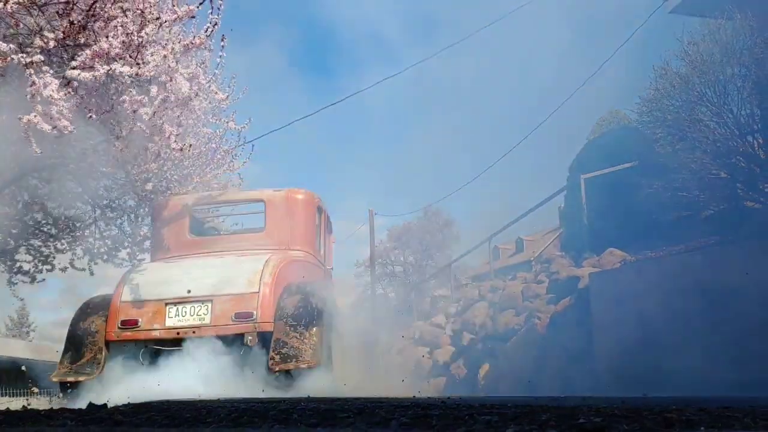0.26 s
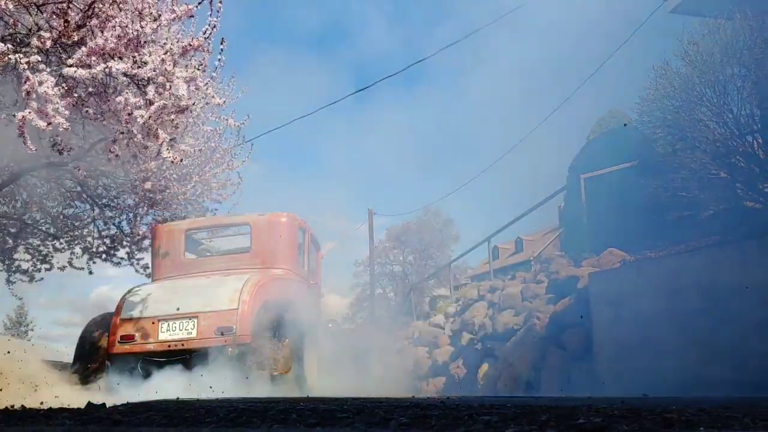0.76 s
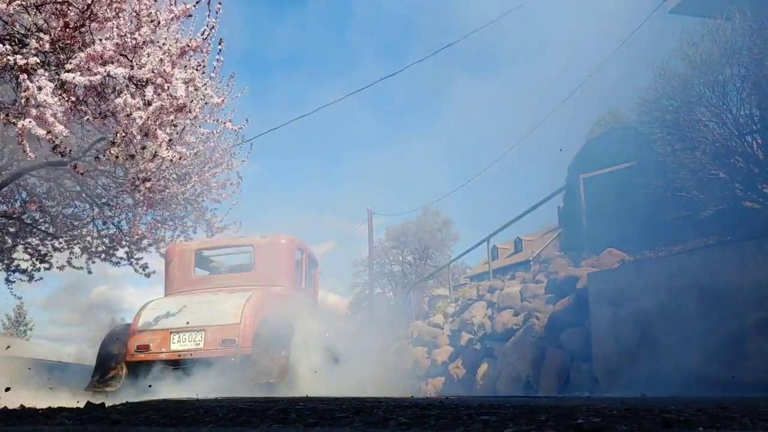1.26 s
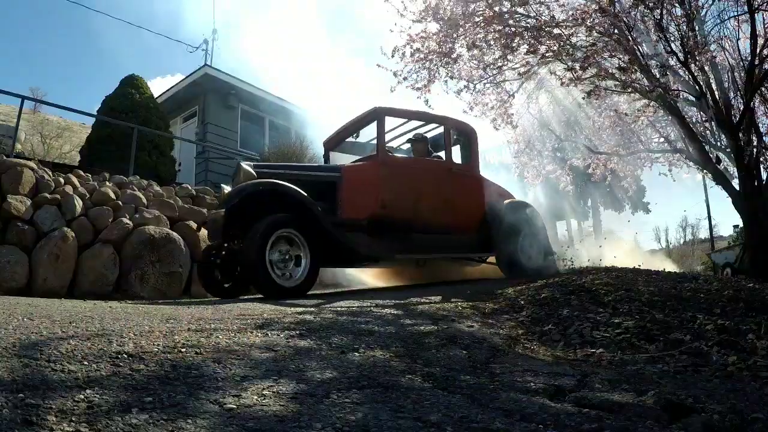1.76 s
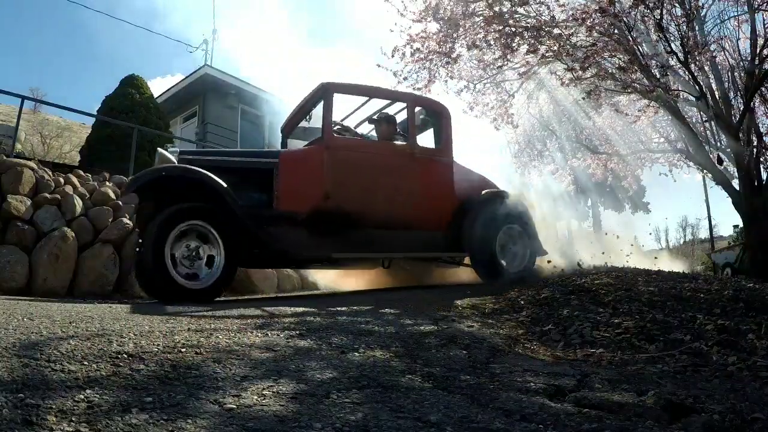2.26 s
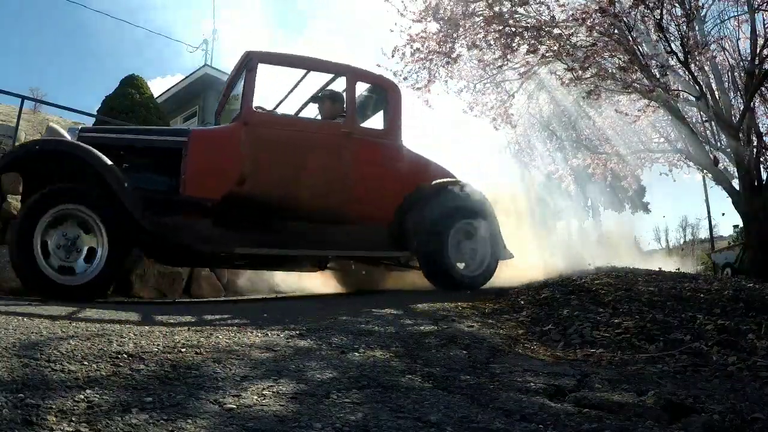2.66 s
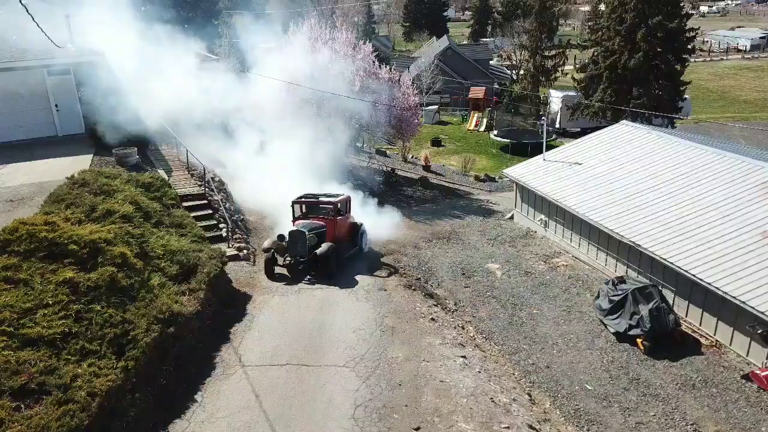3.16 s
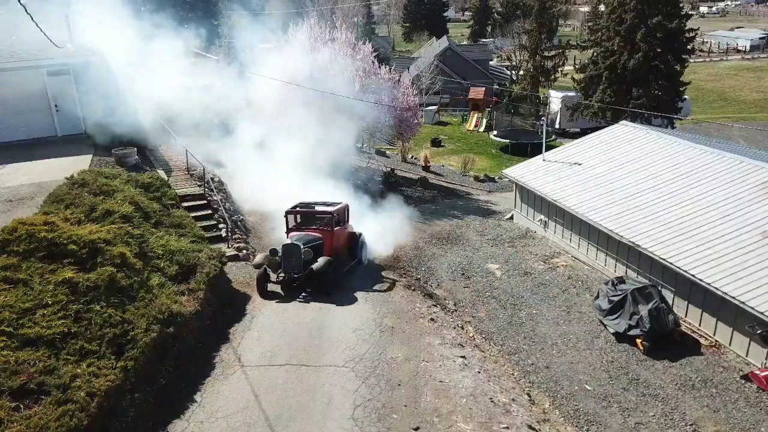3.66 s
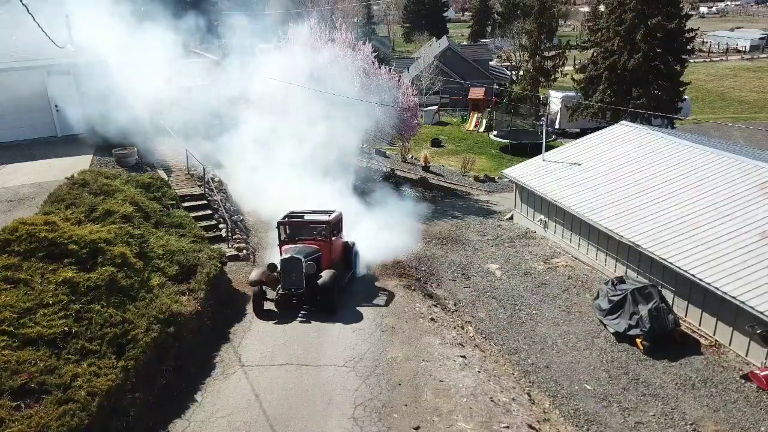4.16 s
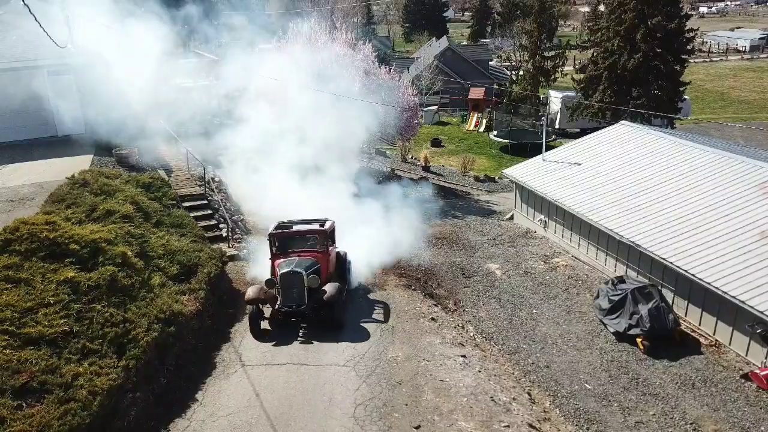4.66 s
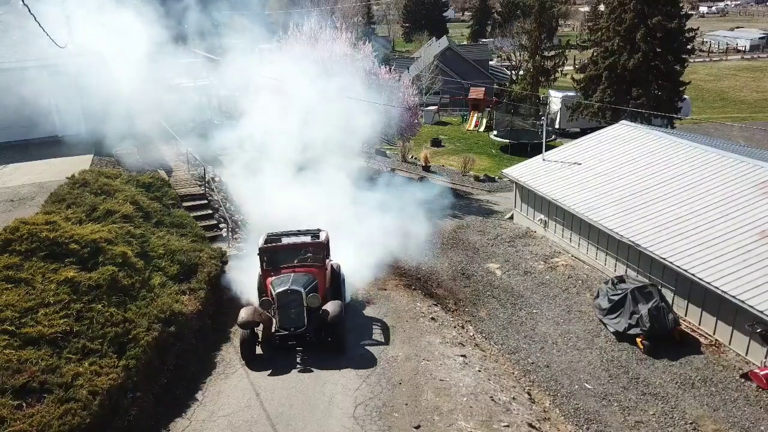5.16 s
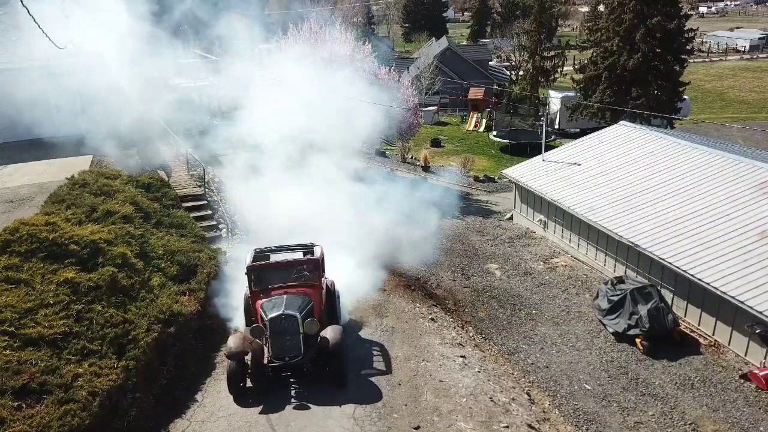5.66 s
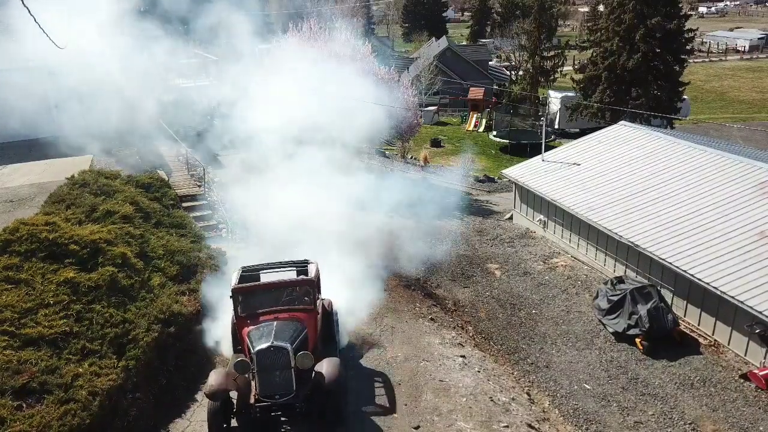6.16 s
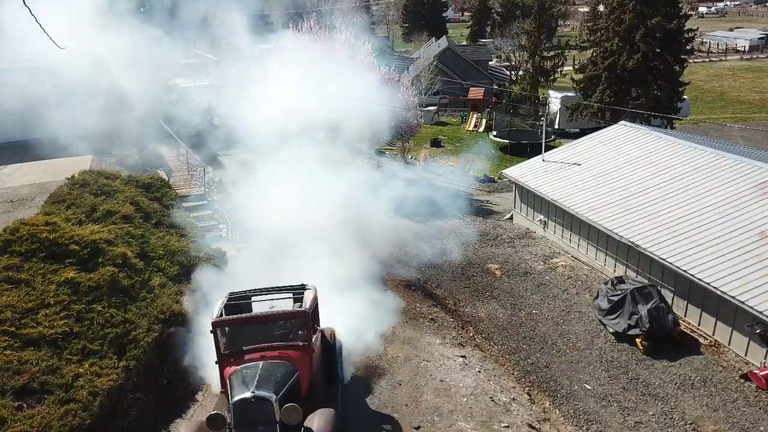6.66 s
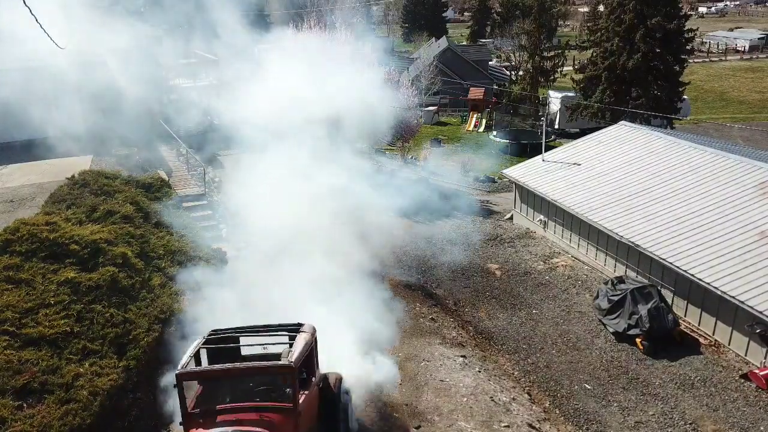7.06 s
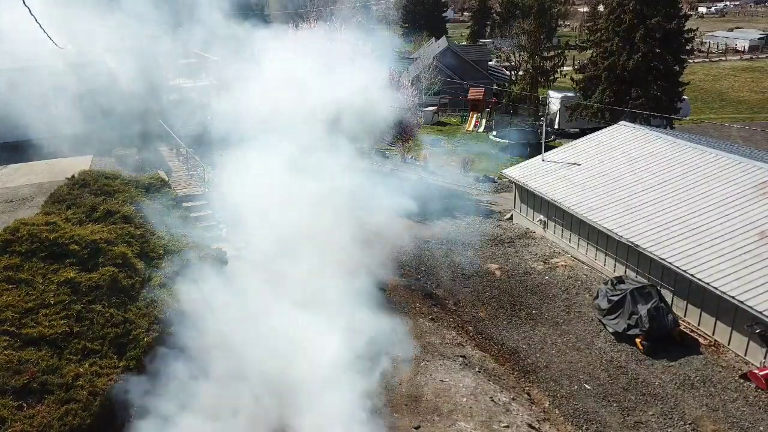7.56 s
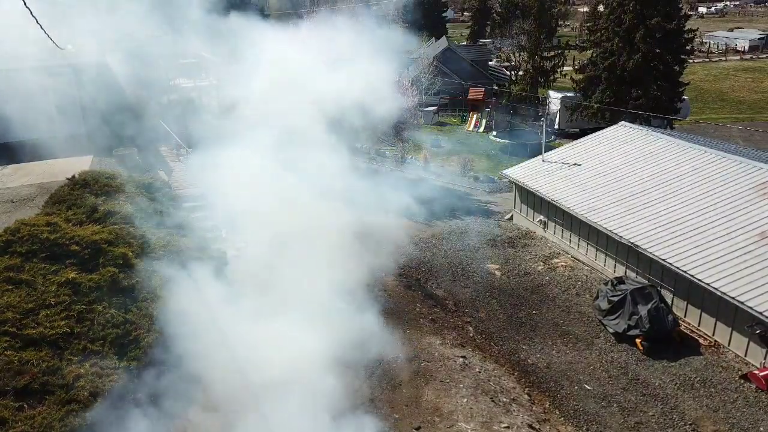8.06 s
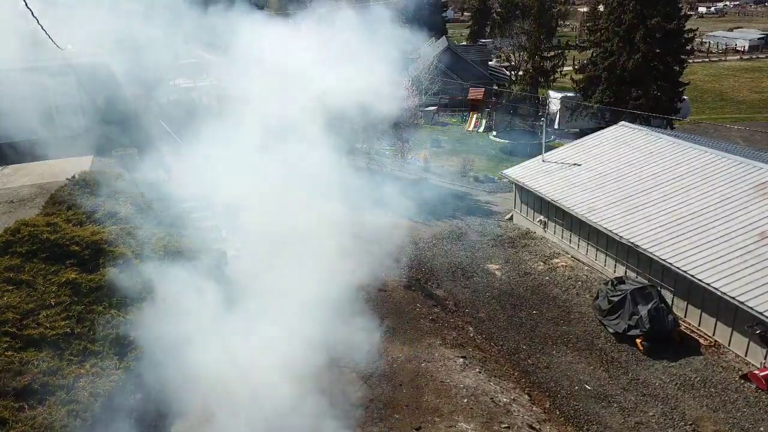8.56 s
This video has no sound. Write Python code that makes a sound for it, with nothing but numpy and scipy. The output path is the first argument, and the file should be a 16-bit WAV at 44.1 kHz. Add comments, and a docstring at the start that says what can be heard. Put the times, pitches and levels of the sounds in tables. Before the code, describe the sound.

An old open-piped V8 revs hard in short throttle stabs and long pulls, barking and rasping over chirping, scrubbing tyres on a driveway.

```python
"""An old V8 coupe with open pipes does a burnout on a driveway: uneven firing orders boom, pulses bark, hiss rasps.
0-2.4 s: short throttle pushes, mostly near 4000 rpm; noise scrubs over a low rumble, tyre chirps squeal clearest.
2.6 s: a long pull from below 2800 rpm; further pushes climb above 5200 rpm by 4.9 s as the squeal thins out.
5.4 s: a second pull from below 2800 rpm; sharp cracks and hard single pulses, scattered so far, crowd at 6.9-7.5 s.
7.9 s: pushes above 5400 rpm, a dip, one last push. Grit and faint echoes run throughout."""
import sys
import numpy as np
from scipy import signal
from scipy.fft import rfft, irfft
from scipy.io import wavfile

SR = 44100
rng = np.random.default_rng(int(sys.argv[2]) if len(sys.argv) > 2 else 0)


def transcribe(signal):
    """Save signal, clipped to [-1, 1], as a 16-bit WAV file at the path in sys.argv[1]."""
    frames = np.atleast_2d(signal).T
    limited = np.clip(frames, -1, 1)
    pcm = np.round(limited * 32767).astype(np.int16)
    wavfile.write(sys.argv[1], SR, pcm)


N = 388942

# throttle pushes, coasting between: start_s, lift_s, start_rpm, lift_rpm, midway_bow_rpm,
# start_load_db, lift_load_db, midway_swell_db, coast_load_db
PUSHES = [(0, 0.093, 4008, 4117, -12, 4, -2, -2, -9), (0.211, 0.617, 3598, 4218, 40, -0.5, 2.5, 2, -5),
          (0.756, 1.252, 3446, 4095, 81, 0, -2.5, 3, -0.5),
          (1.367, 1.611, 4050, 4500, 0, -0.5, -2, 5.5, -3.5),
          (1.836, 2.066, 3541, 3950, -7, -3, -1, 1.5, -3.5),
          (2.2, 2.357, 3800, 3857, -10.5, -6, -9.5, 5, -7),
          (2.624, 3.212, 2769, 4080, -170, -11, 1, -1, -3.5),
          (3.317, 3.597, 4030, 4716, -22, -2, -0.5, 3.5, 0),
          (3.765, 4, 4458, 4753, -19, -7.5, -2.5, 6, -2.5),
          (4.164, 4.48, 4600, 5243, 15, -4.5, -4, 4.5, -4.5),
          (4.646, 4.894, 5048, 5207, -4.5, -5, 1.5, 4.5, 1.5),
          (5.385, 5.751, 2777, 3680, 7.5, -4.5, -1, 4, -1),
          (5.899, 6.17, 3670, 4425, 3.5, -0.5, -0.5, 4.5, 1), (6.293, 6.732, 4410, 4932, 47, 0, 1, 2.5, -1),
          (6.922, 7.262, 4113, 4812, -87, -3, -2, 2, -2.5), (7.375, 7.803, 4580, 5176, 77.5, -2, -5, 3, -2),
          (7.916, 8.25, 5103, 5425, 127, -1, -5, 2, -10), (8.279, 8.32, 5426, 5296, 8.5, -2, -6.5, 0, -8),
          (8.44, 8.825, 4320, 4867, -72.5, -6.5, -9.5, -4.5, 2)]
# firings of one four-stroke cycle: place_eighths, strength_gain, front_sharpness_gain
FIRINGS = [(0, 0.8676, .7), (1.001, 0.475, .25), (1.999, 0.2178, .1), (3, 0.94, 1), (4, 0.1652, .2),
           (4.999, 0.786, .8), (6, 0.817, .6), (7, 0.3242, .15)]
# strong multiples of the cycle rate: order
BOOM_ORDERS = (3, 5, 8, 10, 13)
# answer of each booming order to the throttle: level_db, load_share, shut_db
BOOM_RESPONSE = [(-31, 0.76, 10), (0, 0.39, -4), (-1, 1.27, 0), (-10.5, 0.36, -9.5), (3, 1.25, -6)]
# pipe resonances under the booming orders: freq_hz, level_db
BOOM_RESONANCES = [(70, -6.5), (95, -6), (115, 1), (145, 0.5), (170, 2), (225, -2.5), (265, 3.5),
                   (310, 7.5), (370, -5), (425, 2), (455, 5.5), (500, 0), (550, 2), (600, -12)]
# weaker multiples of the cycle rate: order, level_db (before voicing and pipe)
OVERTONES = [(4, -9), (6, -6.5), (7, -7.5), (9, -4), (11, -4), (12, -14), (14, -3), (15, -9), (16, -4.5),
             (17, -7), (18, -5), (19, -7), (20, -14), (21, -6), (22, -6), (23, -13), (24, -11), (25, -15),
             (26, -8), (27, -12), (28, -17), (29, -12), (30, -17), (31, -16), (32, -15), (34, -18),
             (35, -19)]
# exhaust tone: time_s, low_overtones_db, middle_overtones_db, top_overtones_db, tenth_order_db
VOICING = [(.4, -9, 1, 2.5, 2.5), (.95, -5.5, 1.5, -1.5, -1), (1.4, -6.5, 0.5, 1.5, -3.5),
           (2.05, -6.5, 3, 2.5, -4), (2.7, 4.5, 6.5, 1.5, -3.5), (3.1, 5.5, 6.5, 6.5, -7),
           (3.5, 1.5, -0.5, -2, -5), (4.3, -1, -0.5, -4, -1), (4.8, -2, -1, -9, 2),
           (5.5, 5.5, 1.5, 7, -0.5), (6.0, 2.5, 6.5, 9, -0.5), (6.55, 2.5, 6, 8, 1), (7.1, 3, 4, 6.5, -1.5),
           (8.1, 9.5, 6, 5.5, -3), (8.32, 11, 3, -4, 2.5), (8.6, 16, 7, 5, -1)]
# exhaust at neutral load as the car creeps and turns: time_s, boom_db, firing_tone_db, bark_db, rasp_db
CARRY = [(0, -20, -18.5, -30.5, -34.5), (.5, -19.5, -22, -30.5, -45.5), (1.5, -17.5, -26, -31, -50.5),
         (2.2, -16, -31, -28, -52), (2.8, -24, -15, -30, -40.5), (3.3, -16, -26, -33.5, -51),
         (4.5, -17.5, -38, -28.5, -42.5), (5.4, -26.5, -22, -40.5, -54), (6.5, -21, -32.5, -36.5, -48),
         (7.1, -22, -26.5, -35, -45.5), (7.9, -17, -32, -44, -52.5), (8.82, -25.5, -24, -38.5, -55)]
# ragged firing: time_s, half_length_s, boom_sag_db (negative lifts), fourth_order_db
STUMBLES = [(0.607, 0.033, 8, -28.5), (1.64, 0.026, 2.5, -26), (2.129, 0.032, 2.5, -37),
            (3.653, 0.056, 5.5, -30), (4.093, 0.043, 2, -28), (4.58, 0.041, -2, -20.5),
            (4.918, 0.025, 8, -30), (6.751, 0.026, 5.5, -29), (7.329, 0.017, 2.5, -29),
            (8.159, 0.033, 5, -34), (8.258, 0.03, 11, -31.5), (8.43, 0.029, 8, -58)]
# coarse spitting: time_s, half_length_s, level_db (relative to rasp), brightest_hz
SPITS = [(0.393, .17, 0.5, 2430), (0.945, 0.17, 4, 2480), (1.936, 0.14, 13, 3797), (2.747, 0.091, 6, 3706),
         (3.45, 0.13, -0.5, 4010), (4.359, 0.13, -1, 4094), (5.496, 0.11, 2.5, 3893),
         (6.462, 0.075, -3, 3378), (7.076, 0.14, 2.5, 3690)]
# sharp exhaust cracks and hard single firing pulses: time_s, level_db (before colouring)
CRACKS = [(0.2335, -22), (.489, -25), (0.766, -23), (0.8165, -22), (1.864, -22.5), (1.871, -20.5),
          (1.961, -27), (3.118, -28), (5.392, -27), (5.435, -25), (6.43, -32), (6.482, -30), (6.507, -34),
          (6.9191, -17), (6.926, -18), (6.948, -23), (7.005, -29), (7.063, -32), (7.09, -27), (7.119, -30),
          (7.171, -27), (7.196, -26), (7.454, -31.5)]
# spinning tyres and low rumble: time_s, squeal_pitch_hz, pitch_spread_share (nominal), squeal_db, scrub_db
TYRES = [(0, 1360, .025, -36.5, -32), (.17, 1335, .012, -31.5, -30.5), (.3, 1400, .09, -32.5, -31),
         (.55, 1410, .06, -36, -32.5), (.7, 1385, .015, -35, -30.5), (.8, 1460, 0.01995, -29.5, -29.5),
         (.95, 1330, .11, -41, -31.5), (1.25, 1200, .17, -37, -36), (1.78, 1130, .19, -38, -30.5),
         (2.2, 1250, .16, -40.5, -34.5), (2.5, 1370, .08, -41, -35), (2.8, 1300, .11, -43.5, -34),
         (3.6, 1090, .14, -35.5, -35), (4.4, 1200, .16, -43, -34), (5.0, 1130, .17, -42.5, -38),
         (5.35, 1250, .1, -46, -38), (6.0, 1160, .15, -44.5, -39.5), (7.5, 1070, .1, -42.5, -38.5),
         (8.4, 1060, .06, -47, -42), (8.82, 1060, .09, -49, -43.5)]
# sizzle of hot rubber: time_s, level_db (relative to rasp)
SIZZLE = [(0, -12.5), (2.6, -6), (3.2, -6.5), (3.9, -6), (4.4, -9.5), (4.8, -12), (5.0, -18), (5.4, -12),
          (8.82, -38.5)]
# spectra of overtone ring, turbulent burble and crack thud, rasp, crack, scrub with low rumble: freq_hz, level_db
RING_SPECTRUM = [(60, -29.5), (120, -18), (150, 0.5), (185, 2.5), (240, -0.5), (285, 3), (375, -8.5),
                 (430, 4.5), (490, -4), (540, -1.5), (600, 0), (660, -2.5), (720, -1.5), (860, -7.5),
                 (1150, -6), (1600, -11), (3000, -37.5)]
PIPE_SPECTRUM = [(40, -38.5), (75, -23), (120, -17.5), (170, -11.5), (250, 1), (370, 5), (450, 2),
                 (680, -6), (880, -6), (1150, -10), (1600, -4.5), (2500, -32), (5000, -51)]
RASP_SPECTRUM = [(500, 3.5), (1000, 18.5), (1500, 1.5), (2000, 12), (2700, 10), (3400, 4), (4200, 5.5),
                 (5000, -17.5), (6000, -20), (8000, -22), (10500, -29), (13500, -35.5), (16000, -47)]
CRACK_SPECTRUM = [(500, 4), (1000, 9.5), (1600, 5), (2000, 4), (2700, 9), (4200, 4.5), (5200, -7),
                  (6500, -16), (10000, -23.5), (16000, -29)]
SCRUB_SPECTRUM = [(25, -32), (42, -36.5), (55, -16), (120, 5.5), (200, 2.5), (400, 2.5), (650, 3.5),
                  (1000, 1), (1500, -1.5), (2000, -6), (3200, -11.5), (4300, -14.5), (5200, -24),
                  (6200, -32), (9000, -37), (14000, -43.5)]

SPEED_WOBBLE_SHARE, FIRING_JITTER_CYCLES = .001, .001
ORDER_FLUTTER_DB, PULSE_SPREAD_DB = 2.0, 2.1
MIDDLE_ORDER, TOP_ORDER = 13, 20  # first order of each overtone group
FULL_SHUT_RPM_PER_S = 3900  # rate of fall read as a fully shut throttle
COAST_EBB_DB_PER_S, LOAD_LAG_S = 32.5, 0.0071
RASP_LOAD_SHARE, SCRUB_LOAD_SHARE, SQUEAL_SHUT_DB = 1, 0.31, 1.5
SPIT_DECAY_S, SPIT_SPREAD_DB, CRACKLES_PER_S = .0012, 3.8, 3500
CUTOFF_HZ = 15200


def throttle(bite_db=2.0, bite_s=0.031):
    """Crank rpm, load dB and closure 0-1: bowed ramps in pushes, ebbing load while coasting."""
    t, pushes = np.arange(N) / SR, np.array(PUSHES)
    rpm = np.interp(t, pushes[:, :2].ravel(), pushes[:, 2:4].ravel())
    shut = np.clip(-np.gradient(rpm) * SR / FULL_SHUT_RPM_PER_S, 0, 1) ** 2
    load_db = np.zeros(N)
    for start_s, lift_s, _, _, bow_rpm, start_db, lift_db, swell_db, coast_db in PUSHES:
        held = (t >= start_s) & (t < lift_s)
        along = (t[held] - start_s) / (lift_s - start_s)
        arch = 4 * along * (1 - along)
        rpm[held] += bow_rpm * arch
        load_db[held] = start_db + (lift_db - start_db) * along + swell_db * arch
        coasting = t >= lift_s
        load_db[coasting] = coast_db - COAST_EBB_DB_PER_S * (t[coasting] - lift_s)
    # load overshoots briefly when a shut throttle opens
    bite = np.maximum(lagged(shut, bite_s) - shut, 0)
    return rpm, lagged(load_db + bite_db * bite, LOAD_LAG_S), lagged(shut, LOAD_LAG_S)


def boom_levels(cycle_hz, load_db, shut, carry_db):
    """Booming orders follow load by their own shares and swell on pipe resonances; the lowest rises when shut."""
    levels = []
    for order, (level_db, load_share, shut_db), base_db in zip(BOOM_ORDERS, BOOM_RESPONSE, carry_db):
        resonance_db = at_hz(BOOM_RESONANCES, order * cycle_hz)
        levels.append(base_db + level_db + load_share * load_db + shut_db * shut + resonance_db)
    return levels


def exhaust_note(cycles, shut, boom_db, bark_db, overtone_db=0.0, muffle_db=-7.0):
    """Periodic exhaust: clean booming orders plus jittered overtones ringing the pipe, duller when shut."""
    t = np.arange(N) / SR
    note, pulses = np.zeros(N), np.zeros(N)
    low_db, middle_db, top_db, _ = in_time(VOICING)
    lump = from_db(.7 * drift(20))
    for order, level_db in zip(BOOM_ORDERS, boom_db):
        note += from_db(level_db) * lump * engine_order(cycles, order)

    uneven = cycles + FIRING_JITTER_CYCLES * drift(70)
    for order, level_db in OVERTONES:
        if order < MIDDLE_ORDER:
            voicing_db = low_db
        else:
            voicing_db = (middle_db if order < TOP_ORDER else top_db) + muffle_db * shut
        gain = from_db(level_db + voicing_db + ORDER_FLUTTER_DB * drift(6.6))
        pulses += gain * engine_order(uneven, order, lead_rad=5.28)
    pulse_gain = from_db(bark_db + overtone_db + 1.6 * drift(60))
    note += colour(pulses * pulse_gain, RING_SPECTRUM)

    stumble_tone = engine_order(cycles, order=4)
    for time_s, half_s, sag_db, level_db in STUMBLES:
        ragged = np.exp(-((t - time_s) / half_s) ** 2)
        note = note * from_db(-sag_db * ragged) + from_db(level_db) * ragged * stumble_tone
    return note


def engine_order(cycles, order, lead_rad=4.4):
    """Multiple of the cycle rate, phased by the firing pattern so orders add to push then suction."""
    place, strength, _ = np.transpose(FIRINGS)
    phasors = strength * np.exp(-2j * np.pi * order * place / len(FIRINGS))
    lag_rad = np.angle(np.sum(phasors))
    return np.cos(2 * np.pi * order * cycles + lag_rad + lead_rad)


def exhaust_blast(cycles, bark_db, rasp_db, hiss_db=-0.5, spit_db=0.0, burble_s=0.0021, burble_db=-11.0):
    """Turbulent exhaust: each sharp front gates pipe-coloured burble and bright hiss; listed spells spit."""
    t = np.arange(N) / SR
    clicks = firing_clicks(cycles, PULSE_SPREAD_DB, sharp=True)
    burble = colour(puffs(clicks, burble_s) * rng.standard_normal(N), PIPE_SPECTRUM)
    burble = from_db(bark_db + burble_db) * rms_one(burble)

    gate = puffs(clicks, .0022) + .05
    rasp = from_db(hiss_db) * rms_one(colour(gate * rng.standard_normal(N), RASP_SPECTRUM))

    # sparse tiny shocks inside each puff
    spit_puffs = puffs(firing_clicks(cycles, SPIT_SPREAD_DB), SPIT_DECAY_S)
    crackle = spit_puffs * rng.standard_normal(N) * (rng.random(N) < CRACKLES_PER_S / SR)
    for time_s, half_s, level_db, peak_hz in SPITS:
        spit_spectrum = [(500, -14), (1500, -8), (peak_hz, 0), (4600, -7), (5500, -19), (7000, -26),
                         (14000, -33)]
        spell = np.exp(-((t - time_s) / half_s) ** 4)
        rasp = rasp + from_db(level_db + spit_db) * spell * rms_one(colour(crackle, spit_spectrum))
    return burble + from_db(rasp_db) * rasp


def firing_clicks(cycles, spread_db, sharp=False):
    """One click per exhaust valve opening, randomly varied, sized by strength or front sharpness."""
    clicks, turns = np.zeros(N), np.arange(int(cycles[-1]) - 1)
    chance = rng.standard_normal((400, len(FIRINGS)))
    for j, (place, strength, sharpness) in enumerate(FIRINGS):
        at = np.searchsorted(cycles, turns + place / len(FIRINGS))
        size = sharpness if sharp else strength
        clicks[at] += size * from_db(spread_db * chance[turns, j])
    return clicks


def cracks(crack_db=0.0, thud_db=0.0, decay_s=0.00084, shock_gain=1.01, tearing_gain=0.79):
    """Sharp exhaust cracks and hard single firing pulses: shock front and noise burst, bright plus a pipe thud."""
    clicks = np.zeros(N)
    for time_s, level_db in CRACKS:
        clicks[round(time_s * SR)] = from_db(level_db)
    shock = shock_gain * puffs(clicks, .0001)
    tearing = tearing_gain * puffs(clicks, decay_s) * rng.standard_normal(N)
    burst = shock + tearing
    crack = from_db(crack_db) * colour(burst, CRACK_SPECTRUM)
    thud = from_db(thud_db) * 2 * colour(burst, PIPE_SPECTRUM)
    return crack + thud


def tyres(rasp_db, load_db, shut, scrub_flutter_db=2.0, grit_per_s=500, grit_db=-18.5):
    """Stick-slip squeal over broad scrub noise with low rumble, load-following sizzle, random grit impacts."""
    pitch_hz, spread, squeal_db, scrub_db = in_time(TYRES)
    squeal_db = squeal_db + SQUEAL_SHUT_DB * shut
    scrub_db = scrub_db + SCRUB_LOAD_SHARE * load_db
    sizzle_db, = in_time(SIZZLE)

    scrub_noise = rng.standard_normal(N) * from_db(scrub_flutter_db * np.tanh(drift(13.0)))
    scrub = rms_one(colour(scrub_noise, SCRUB_SPECTRUM))

    stones = (rng.random(N) < grit_per_s / SR) * rng.random(N)
    grit_spectrum = [(800, -17.5), (2500, -10.0), (4200, 2.5), (6000, -16.5), (14000, -29.5)]
    grit = rms_one(colour(puffs(stones, 0.0012) * rng.standard_normal(N), grit_spectrum))

    sizzle_spectrum = [(3000, -19.5), (5000, 9.5), (6500, -1), (8500, -5.0), (11000, -14.5), (15000, -22.5)]
    sizzle = rms_one(colour(rng.standard_normal(N), sizzle_spectrum))
    return (from_db(squeal_db) * squeal(pitch_hz, spread)
            + from_db(scrub_db) * (scrub + from_db(grit_db) * grit)
            + from_db(rasp_db + sizzle_db) * sizzle)


def squeal(pitch_hz, spread):
    """Seven tread patches stick and slip in broken chirps: near unison at low spread, scattered at high."""
    chirps = 0
    for _ in range(7):
        slow_bend = spread * np.tanh(drift(5)) * 1.4
        rough_bend = (.026 + .3 * spread) * drift(200)
        hz = pitch_hz * np.exp(slow_bend + rough_bend)
        tone = np.sin(2 * np.pi * np.cumsum(hz) / SR)
        chirps = chirps + tone * from_db(5 * np.tanh(drift(16) - .3) + 3 * drift(90))
    return rms_one(chirps)


def yard(x, t60_s=0.21):
    """Faint echoes from driveway and rock wall: decaying noise tail after a 12 ms gap."""
    t = np.arange(SR // 2) / SR
    tail = rng.standard_normal(len(t)) * from_db(-60 * t / t60_s) * (t > .012)
    echoes = signal.fftconvolve(x, tail / np.sqrt(np.sum(tail ** 2)))[:N]
    return x + colour(echoes, [(200, -30), (900, -17), (9000, -22)])


def puffs(clicks, decay_s):
    """Exponentially decaying envelope after each click."""
    return signal.lfilter([1], [1, -np.exp(-1 / (decay_s * SR))], clicks + 1e-18)


def colour(x, spectrum):
    """Causal minimum-phase filter with the given spectrum, built by folding its cepstrum."""
    size = 8192
    grid_hz = np.maximum(np.arange(size // 2 + 1) * SR / size, 1)
    cepstrum = irfft(np.log(from_db(at_hz(spectrum, grid_hz))))
    cepstrum[1:size // 2] *= 2
    cepstrum[size // 2 + 1:] = 0
    return signal.fftconvolve(x, irfft(np.exp(rfft(cepstrum))))[:N]


def at_hz(spectrum, hz):
    """Spectrum level in dB, interpolated on log frequency."""
    points_hz, db = np.transpose(spectrum)
    return np.interp(np.log(hz), np.log(points_hz), db)


def drift(rate_hz):
    """Smooth random wander, roughly rate_hz turns a second, spread near 1."""
    r = np.exp(-80 * np.pi * rate_hz / SR)
    # one point per 40 samples; the first 2000 settle the filter
    slow = signal.lfilter([1], [1, -2 * r, r * r], rng.standard_normal(N // 40 + 2002))[2000:]
    return np.interp(np.arange(N) / 40, np.arange(len(slow)), rms_one(slow))


def lagged(x, lag_s):
    """First-order lag of a control signal."""
    r = np.exp(-1 / (lag_s * SR))
    return x[0] + signal.lfilter([1 - r], [1, -r], x - x[0])


def in_time(rows):
    """Each column of a time table, interpolated at every sample."""
    time_s, *columns = np.transpose(rows)
    return [np.interp(np.arange(N) / SR, time_s, c) for c in columns]


def rms_one(x):
    """Scale to rms 1."""
    return x / np.sqrt(np.mean(x ** 2) + 1e-20)


def from_db(db):
    """Decibels to gain."""
    return 10 ** (np.asarray(db) / 20)


def scene():
    """Crank speed times the exhaust, load sets its levels; cracks, tyres and yard echoes join."""
    rpm, load_db, shut = throttle()
    low_db, firing_db, bark_db, rasp_db = in_time(CARRY)
    cycle_hz = rpm / 120 * (1 + SPEED_WOBBLE_SHARE * drift(25))  # two turns per cycle
    cycles = np.cumsum(cycle_hz) / SR
    tenth_db = low_db + in_time(VOICING)[-1]
    boom_db = boom_levels(cycle_hz, load_db, shut, (0, low_db, firing_db, tenth_db, bark_db))
    bark_db = bark_db + load_db
    rasp_db = rasp_db + RASP_LOAD_SHARE * load_db
    engine = exhaust_note(cycles, shut, boom_db, bark_db) + exhaust_blast(cycles, bark_db, rasp_db) + cracks()
    return yard(engine + tyres(rasp_db, load_db, shut))[None]


def record(dry):
    """4 ms fade-in, then a steep elliptic low-pass."""
    fade = np.minimum(np.arange(N) / (.004 * SR), 1)
    low_pass = signal.ellip(10, .1, 80, CUTOFF_HZ, fs=SR, output="sos")
    return signal.sosfilt(low_pass, fade * dry)


dry = scene()
out = record(dry)
transcribe(out)
```